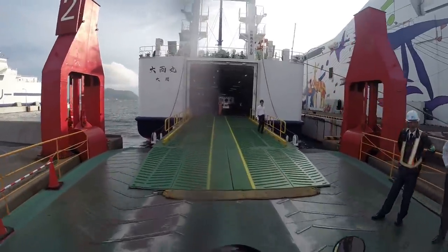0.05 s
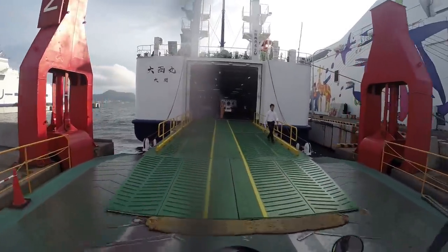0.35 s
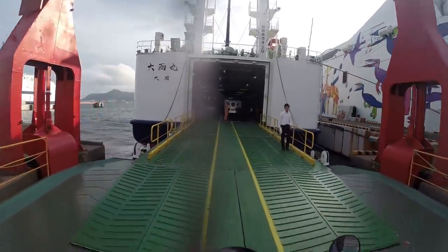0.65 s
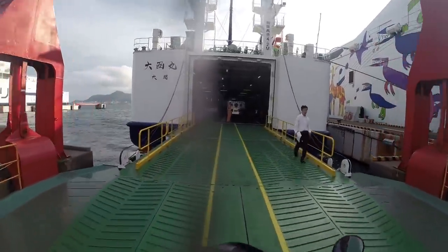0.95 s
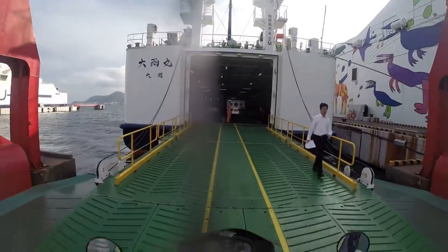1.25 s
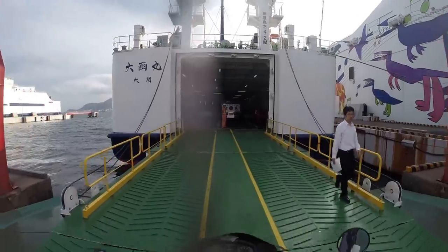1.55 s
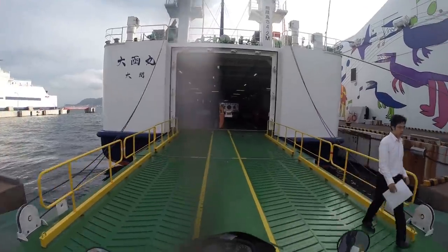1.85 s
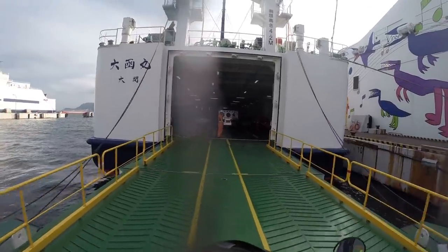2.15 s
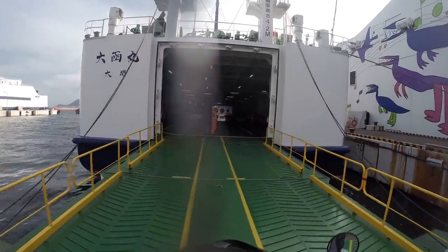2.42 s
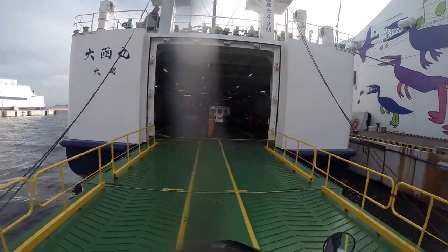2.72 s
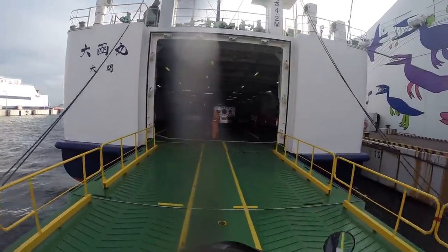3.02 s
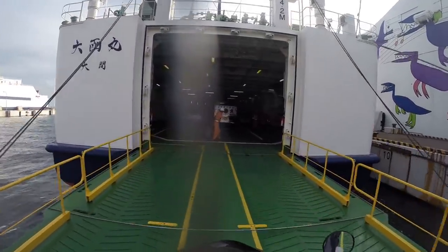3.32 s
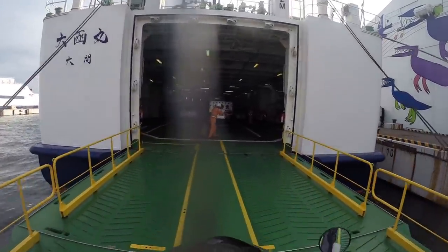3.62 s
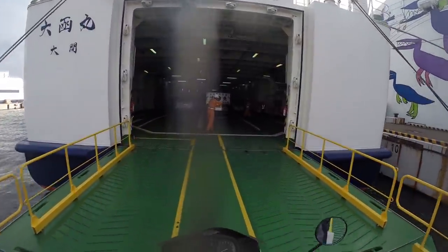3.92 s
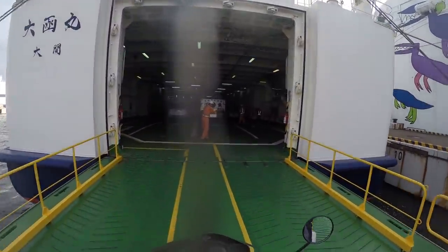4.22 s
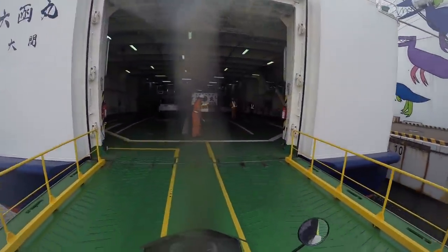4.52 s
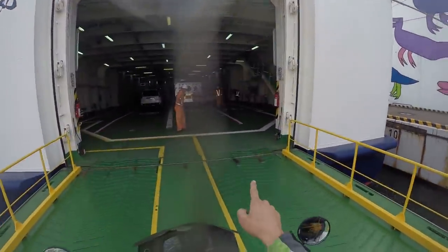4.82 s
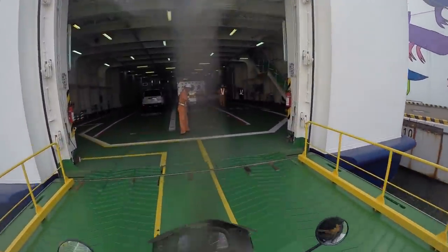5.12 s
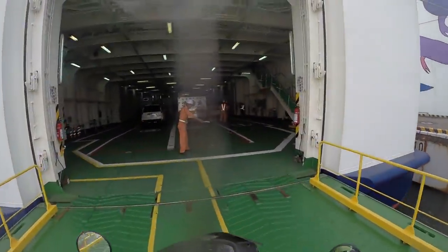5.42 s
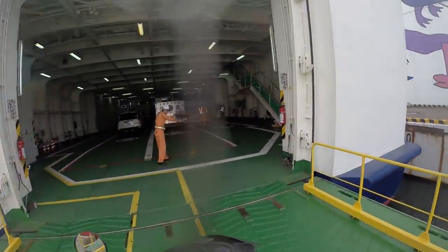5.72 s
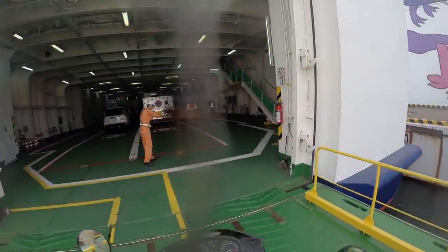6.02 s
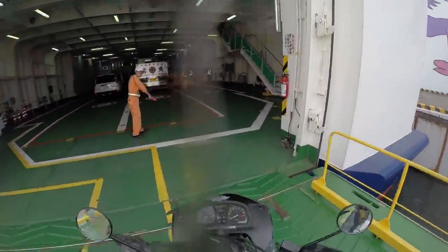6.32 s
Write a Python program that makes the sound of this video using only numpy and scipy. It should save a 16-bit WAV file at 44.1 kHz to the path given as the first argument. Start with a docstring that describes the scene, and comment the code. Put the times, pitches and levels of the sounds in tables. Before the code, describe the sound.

Steel clanks and bounces over a big motorcycle's lumpy idle, then the engine swells into a low drone twice before gusts hit the microphone.

```python
"""A big motorcycle rolls at walking pace up a steel ferry ramp, heard from a cased camera on the rider.
First the ramp's loose flap clanks and bounces while a nudge of throttle lifts the engine's lumpy idle.
Next the wheel thumps over the ramp's edge. Two more nudges blend the exhaust beats into a drone,
with a softer thump between them. Then something ticks on the camera case, and last, at the mouth
of the car deck, gusts buffet the case and it ticks again."""
import sys
import numpy as np
from scipy import signal
from scipy.fft import rfft, irfft, next_fast_len
from scipy.io import wavfile
from scipy.ndimage import uniform_filter1d

SR = 44100
rng = np.random.default_rng(int(sys.argv[2]) if len(sys.argv) > 2 else 0)


def transcribe(signal):
    """Save signal, clipped to [-1, 1], as a 16-bit WAV file at the path in sys.argv[1]."""
    frames = np.atleast_2d(signal).T
    limited = np.clip(frames, -1, 1)
    pcm = np.round(limited * 32767).astype(np.int16)
    wavfile.write(sys.argv[1], SR, pcm)


N = 284545
T = np.arange(N) / SR

# Tone of the gear whirr, also used for the case shaking in the wind: pitch_hz, level_db
WHIRR_COLOUR = [(500, -1.5), (900, -2), (1150, -0.5), (1350, 0), (1680, 3), (1850, -4.5), (2100, -4),
                (2350, 1), (2800, -9), (4400, -11), (5000, -18.5), (6100, -18.5), (7600, -33.5),
                (11500, -54)]


def undb(db):
    """Turn decibels into a number to multiply by."""
    return 10 ** (np.asarray(db) / 20)


def unit(x):
    """Scale a sound so its average power is 1."""
    return x / np.sqrt(np.mean(x ** 2))


def noise():
    """Plain hiss (white noise)."""
    return rng.standard_normal(N)


def walk(rate):
    """Wander by about 1 either way, with `rate` random turns a second."""
    return 1.2 * np.interp(T * rate, np.arange(16384), rng.standard_normal(16384))


def ease(start_s, length_s):
    """A smooth step from 0 to 1."""
    return np.sin(np.pi / 2 * np.clip((T - start_s) / length_s, 0, 1)) ** 2


def fade(t, fade_s):
    """Die away by 60 dB in fade_s seconds."""
    return np.exp(-np.log(1000) * t / fade_s)


def impulses(times, sizes):
    """One push of the given size at each time."""
    return np.bincount(np.clip(np.asarray(times) * SR, 0, N - 1).astype(int), sizes, N)


def ring(modes):
    """An object's answer to one tap: its own fading tones (modes), scaled to peak at 1."""
    t = T[:SR]
    response = sum(undb(db) * np.sin(2 * np.pi * hz * t) * fade(t, fade_s) for hz, db, fade_s in modes)
    return response / np.abs(response).max()


def drive(force, response):
    """Start a copy of the response at every push in the force."""
    return signal.fftconvolve(force, response)[:N]


def colour(x, points, size=8192):
    """Shape a sound's tone along a curve of (pitch_hz, level_db) points."""
    hz, db = np.transpose(points)
    grid_hz = np.maximum(np.arange(size // 2 + 1) * SR / size, 1)
    curve = undb(np.interp(np.log(grid_hz), np.log(hz), db))
    cepstrum = irfft(np.log(curve))
    # folding this in half keeps the filter from ringing before a sound starts
    cepstrum[1:size // 2] *= 2
    cepstrum[size // 2 + 1:] = 0
    response = irfft(np.exp(rfft(cepstrum)))
    return drive(x, response / np.linalg.norm(response))


def passband(x, hz, kind, order=2):
    """Keep the "low" or the "high" side of hz; a higher order cuts more steeply."""
    return signal.sosfilt(signal.butter(order, min(hz, SR / 3), kind, fs=SR, output="sos"), x)


def rolling(level_db=-36.5):
    """Tyres rumble over the ribbed steel."""
    # Tone of the rumble: pitch_hz, level_db
    rumble_colour = [(22, -40), (35, 11.5), (50, -33), (65, 9.5), (100, 4), (150, -1.5), (300, -7.5),
                     (430, -16), (580, -16), (800, -24.5), (1500, -26.5), (4000, -38.5), (9000, -76)]
    ribs = undb(walk(22))
    rumble = unit(colour(noise() * ribs, rumble_colour))
    return passband(rumble, 32, "high", order=6) * undb(level_db)


def gusts(breeze_db=-53.5, ebb_db_per_s=19, drop_s=0.064):
    """Wind pressure: each gust swells, ebbs and drops back to the light breeze of riding."""
    # Gusts on the case: start_s, rise_s, drop_at_s, level_db
    blasts = [(5.834, 0.11, 6.1, -15.5), (6.195, 0.035, 6.245, -21.5), (6.287, 0.021, 6.45, -15)]
    pressure = undb(breeze_db)
    for start, rise, drop_at, db in blasts:
        ebb_db = ebb_db_per_s * np.maximum(T - start - rise, 0)
        pressure = pressure + undb(db - ebb_db) * ease(start, rise) * (1 - ease(drop_at, drop_s))
    return pressure


def wind(swirl_db=1.25, flutter_db=-27, side_db=-24):
    """Swirls of air push on the case, a little differently on each side, and make it shake."""
    # Tone of the buffeting: pitch_hz, level_db
    buffet_colour = [(30, -23.5), (55, -28), (80, 7), (105, 2.5), (180, 1.5), (260, -6), (305, -3.5),
                     (390, -12.5), (490, -11.5), (660, -18.5), (820, -29.5), (1400, -46.5)]
    pressure = gusts()
    push = pressure * undb(swirl_db * walk(60))
    buffets = [unit(colour(noise(), buffet_colour)) * push for _ in range(2)]
    middle, side = (passband(buffet, 900, "low", order=4) for buffet in buffets)
    flutter = undb(flutter_db) * unit(colour(noise(), WHIRR_COLOUR)) * pressure
    side = undb(side_db) * passband(side, 230, "high")
    return middle + flutter + np.array([side, -side])


def case_ticks():
    """Small hard taps ring the plastic case; each spot brings out different tones."""
    # Taps on the case: start_s, level_db, centre_pitch_hz
    taps = [(4.9592, -16, 2698), (4.9602, -13.5, 1150), (6.3135, -17, 1100), (6.3205, -12.5, 2400),
            (6.3225, -9, 1720), (6.345, -24, 2200)]
    # The case's own tones: pitch_hz, level_db, fade_s
    case_modes = [(1202, 2.5, 0.061), (1280, -1.5, 0.021), (1630, -14, 0.036), (1650, -0.5, 0.019),
                  (2360, 1.5, 0.029), (2580, -5, 0.063)]
    force = np.zeros(N)
    for start, db, hz in taps:
        tap = passband(impulses([start], [undb(db)]), hz / np.sqrt(2), "high", order=3)
        force += passband(tap, hz * np.sqrt(2), "low", order=3)
    return passband(drive(force, ring(case_modes)), 3100, "low", order=4)


def flap_song(pitch_hz=1745, width_hz=170, level_db=-50, until_s=1.0):
    """A thin steel ring lingers and wavers while the flap keeps trembling, then stops."""
    band_hz = [pitch_hz - width_hz / 2, pitch_hz + width_hz / 2]
    ringing = signal.sosfilt(signal.butter(2, band_hz, "band", fs=SR, output="sos"), noise())
    return undb(level_db) * unit(ringing) * (1 - ease(until_s, .05))


def flap_bounces(count=7, first_hop_s=.053, hop_ratio=.94):
    """List each blow of the flap and its ever quicker, weaker bounces: start_s, level_db, rattle_s."""
    # The flap striking the quay: start_s, level_db, rattle_s, loss_per_bounce_db
    clanks = [(0.0, -15.5, 0.0036, 12.5), (0.025, -23.5, 0.033, 8), (0.127, -22.5, 0.009, 14),
              (0.21, -8.5, .015, 3.5), (0.528, -27.5, 0.019, 12)]
    hops = first_hop_s * hop_ratio ** np.arange(count)
    return [(start + hops[:k].sum(), db - k * loss_db, rattle_s)
            for start, db, rattle_s, loss_db in clanks for k in range(count)]


def ramp_flap(clash_db=-5, clash_fade_s=.13, tail_db=-24, tail_fade_s=1.0, tones_db=17, rise_s=0.0058):
    """Each blow is a rattle of tiny contacts: a short clash over the long tones of the steel."""
    # The steel flap's own tones: pitch_hz, level_db
    flap_modes = [(1098, -50), (1276, -42), (1335, -43), (1384, -44), (1410, -41), (1502, -45), (1577, -40),
                  (1685, -42), (1793, -52), (1846, -50), (1954, -47), (2019, -46), (2089, -53), (2110, -48),
                  (2191, -44), (2326, -48), (2385, -48), (2476, -48), (2519, -46), (2740, -51), (2875, -52),
                  (3009, -48), (3031, -48), (3074, -50), (3095, -53), (3138, -53), (3225, -53), (3445, -62)]
    # Tone of the clash: pitch_hz, level_db
    clash_colour = [(150, -9.5), (400, -3), (550, -15.5), (850, -13.5), (1100, -5.5), (1300, 2),
                    (1680, 7.5), (1820, -1.5), (2150, 2.5), (2600, 2.5), (3200, -7), (3700, -19.5),
                    (5800, -32), (10000, -73)]
    t = T[:SR]
    hz, mode_db = np.transpose(flap_modes)[:, :, None]
    modes = undb(mode_db) * np.exp(2j * np.pi * hz * t) * fade(t, fade_s=0.9)
    power, tones = np.zeros(N), np.zeros(N)
    for start, db, rattle_s in flap_bounces():
        i = max(int(start * SR), 0)
        blow = undb(db) * (1 - np.exp(-t / rise_s))
        decay = fade(np.maximum(t - rattle_s, 0), clash_fade_s) + undb(tail_db) * fade(t, tail_fade_s)
        power[i:i + SR] += (blow * decay) ** 2
        # every blow lands on a new spot, so each tone starts at a new point in its swing
        spot = np.exp(2j * np.pi * rng.random(len(modes)))
        tones[i:i + SR] += blow * (spot @ modes).imag
    contacts = unit(noise() * undb(walk(900))) * np.sqrt(power)
    return undb(clash_db) * colour(contacts, clash_colour) + undb(tones_db) * tones


def fork_squeak(at_s=1.395, width_s=.025, pitch_hz=6450, level_db=-64):
    """The front fork squeaks faintly as it springs back from the ramp's edge."""
    rub = unit(passband(noise(), 220, "low", order=4)) * np.sin(2 * np.pi * pitch_hz * T)
    return undb(level_db) * rub * np.exp(-((T - at_s) / width_s) ** 2)


def wheel_thumps(sag_share=0.36, sag_s=0.023, frame_db=-5):
    """The squeezed tyre rings, its pitch sagging as it relaxes; the jolt passes on to the frame."""
    # The wheel hitting the ramp's edge and ribs: start_s, level_db, pitch_hz, swell_s
    bumps = [(1.323, -15.5, 153.5, 0.0068), (1.367, -18, 113, 0.0095), (1.507, -26, 106, 0.0056),
             (3.04, -30, 70.14, 0.013)]
    # Tones of the suspension and frame: pitch_hz, level_db, fade_s
    frame_modes = [(64.5, -2, .14), (120, 5, 0.28), (187, 1.5, 0.12), (316, -1, 0.093)]
    tyre = np.zeros(N)
    for start, db, hz, swell_s in bumps:
        t = np.maximum(T - start, 0)
        pitch_hz = hz * (1 - sag_share * (1 - np.exp(-t / sag_s)))
        turns = np.cumsum(pitch_hz * (t > 0)) / SR
        swell = t / swell_s * np.exp(1 - t / swell_s)
        tyre += undb(db) * swell * np.sin(2 * np.pi * turns)
    times, db = np.transpose(bumps)[:2]
    frame = drive(impulses(times, undb(db + frame_db)), ring(frame_modes))
    return passband(tyre + frame, 420, "low", order=4)


def throttle(idle_hz=10.5, sag_hz_per_s=2.2, run_down_s=.3, drone_rise_s=0.37, drone_ebb_db_per_s=5):
    """Engine speed and drone strength: each nudge speeds it up, the climb drags on it, then it idles."""
    # Nudges of throttle: open_s, run_up_s, close_s, top_speed_hz (engine cycles a second), drone_db
    nudges = [(-0.05, .4, .88, 14.1, -42), (1.7, 0.78, 2.56, 16.9, -30), (3.66, .46, 4.58, 18.4, -27.5)]
    cycle_hz, drone_gain = np.full(N, idle_hz), np.zeros(N)
    for opens, run_up, closes, top_hz, db in nudges:
        since = np.maximum(T - opens, 0)
        held = 1 - ease(closes, run_down_s)
        sag_hz = sag_hz_per_s * np.maximum(since - run_up, 0)
        cycle_hz += (top_hz - sag_hz - idle_hz) * np.sqrt(ease(opens, run_up)) * held
        # the drone builds at once and eases off as the bike gathers speed
        drone_gain += undb(db - drone_ebb_db_per_s * since) * ease(opens, drone_rise_s) * held ** 2
    return cycle_hz, drone_gain


def gears_and_valves(cycles, load, idle_db=-46.5, load_rise_db=1.2, ramp_rise_db=3, on_ramp_s=1.24):
    """Chain and gears whirr, louder once the steel ramp is below; four valves a cycle chatter shut."""
    chatter = np.exp(-(4 * cycles % 1) / 0.12) * undb(4.5 * walk(50))
    swing = 1 + 0.064 * np.cos(2 * np.pi * cycles)
    whirr = colour(noise() * (1 + 0.25 * chatter) * swing, WHIRR_COLOUR)
    db = idle_db + load_rise_db * load + ramp_rise_db * ease(on_ramp_s, 0.1)
    flicker_db = 0.5 * walk(9)
    return unit(whirr) * undb(db + flicker_db)


def gear_strain(cycles, load, throb_share=0.26, level_db=-48):
    """Chain and gears grind louder as the engine works, throbbing with its power strokes."""
    # Tone of the grinding: pitch_hz, level_db
    grind_colour = [(700, -23), (1100, -13.5), (1300, 5.5), (1550, -6), (1900, -17.5), (2300, 4.5),
                    (2700, -21.5), (3700, -4), (6000, -51)]
    throb = 1 + throb_share * np.cos(2 * np.pi * cycles)
    return undb(level_db) * load ** 2 * unit(colour(noise(), grind_colour)) * throb


def engine_drone(cycles, gain, smear=.2, stumble_cycles=.0035):
    """Firings merge into a drone; the pipe smears each pulse and small stumbles roughen the top."""
    # Tones of the drone: multiple_of_cycle_rate, level_db
    harmonics = [(2, -20), (4, -10), (5, -6.5), (6, 0), (7, -15), (10, -18), (12, -15), (13, -9.5),
                 (14, -18), (15, -19), (17, -22), (19, -26)]
    turns = cycles + stumble_cycles * walk(45)
    tones = np.zeros(N)
    for multiple, db in harmonics:
        size = undb(db + .8 * walk(9))
        tones += size * np.cos(2 * np.pi * multiple * turns - smear * multiple ** 2)
    return passband(unit(tones) * gain, 700, "low", order=4)


def exhaust(cycles, load, weak_at_cycle=.37, weak_db=-5, puff_db=-19, idle_db=-35.5, merge_db=-9.5):
    """A strong and a weak firing each cycle ring the pipe; they stumble at idle and steady under load."""
    # Tones of the exhaust pipe and silencer: pitch_hz, level_db, fade_s
    pipe_modes = [(72, -22, 0.088), (89.7, 12.5, 0.2), (96, -4.5, 0.034), (190, -22, 0.2), (222.5, -4, .08),
                  (284, -23, .07), (375, -25, .05)]
    count = int(cycles[-1])
    firing_cycles = (np.arange(count)[:, None] + [0, weak_at_cycle]).ravel()
    times = np.interp(firing_cycles, cycles, T)
    chance = rng.uniform(-1, 1, (256, 2))[:len(times)] * np.sqrt(3)
    firing_load = np.interp(times, T, load)
    stumble_s = chance[:, 0] * np.interp(firing_load, [0, 1], [0.0016, .0003])
    scatter_db = chance[:, 1] * np.interp(firing_load, [0, 1], [2.5, -1.0])
    firings = impulses(times + stumble_s, undb(np.tile([0, weak_db], count) + scatter_db))
    pipe = passband(drive(firings, ring(pipe_modes)), 58, "high", order=4)
    # swirling gas follows each firing out of the silencer
    puff = drive(firings, fade(T[:SR], fade_s=0.12)) * passband(noise(), 140, "high")
    puff = undb(puff_db) * unit(passband(puff, 450, "low"))
    beats = passband(unit(pipe) + puff, 520, "low", order=4)
    # even out the loudness, then let the separate beats sink into the drone as the load grows
    loudness = np.sqrt(uniform_filter1d(beats ** 2, size=SR // 3))
    return beats / loudness * undb(idle_db + merge_db * load)


def microphones(x, side_db):
    """Two microphone holes close together catch each wave slightly out of step."""
    shifted = signal.hilbert(x, next_fast_len(N))[:N].imag  # every tone moved by a quarter wave
    side = undb(side_db) * passband(shifted, 200, "high", order=1)
    return np.array([x + side, x - side])


def scene(no_load_hz=12, full_load_hz=18):
    """All sound comes through the closed case, so left and right are nearly alike."""
    cycle_hz, drone_gain = throttle()
    cycles = np.cumsum(cycle_hz) / SR
    # how hard the engine works, from 0 to 1
    load = np.clip((cycle_hz - no_load_hz) / (full_load_hz - no_load_hz), 0, 1)
    engine = exhaust(cycles, load) + engine_drone(cycles, drone_gain)
    gears = gears_and_valves(cycles, load) + gear_strain(cycles, load)
    bike = engine + gears + rolling() + wheel_thumps() + fork_squeak()
    clatter = ramp_flap() + flap_song() + case_ticks()
    return microphones(bike, side_db=-53.5) + microphones(clatter, side_db=-25.5) + wind()


def record(dry):
    """The camera cuts the lowest rumble and the highest treble."""
    bottom_hz, top_hz = 31, 11900
    body = passband(dry, bottom_hz, "high", order=6)
    return signal.sosfilt(signal.ellip(8, .2, 70, top_hz, fs=SR, output="sos"), body)


dry = scene()
out = record(dry)
transcribe(out)
```